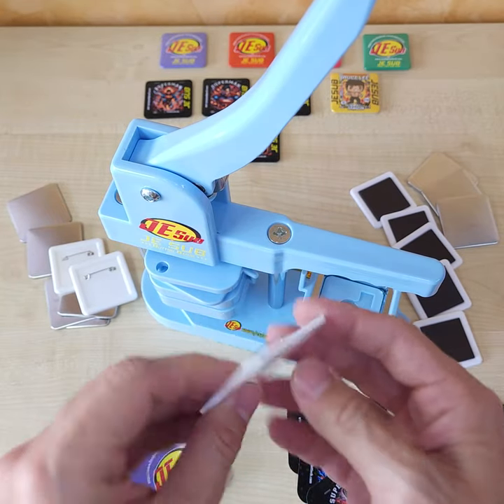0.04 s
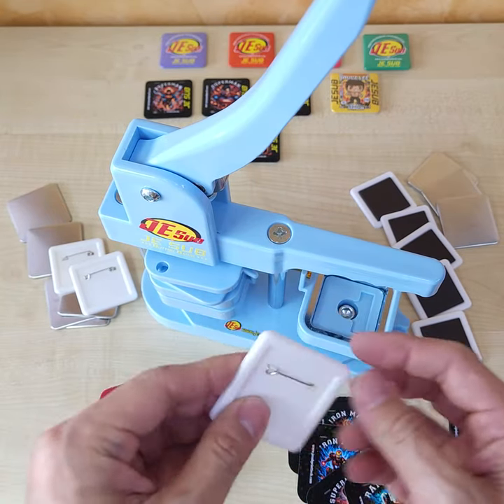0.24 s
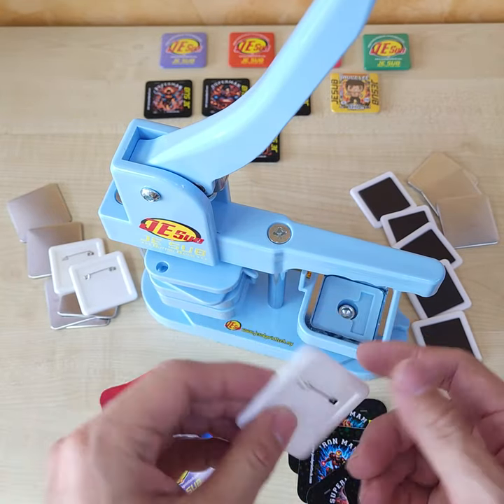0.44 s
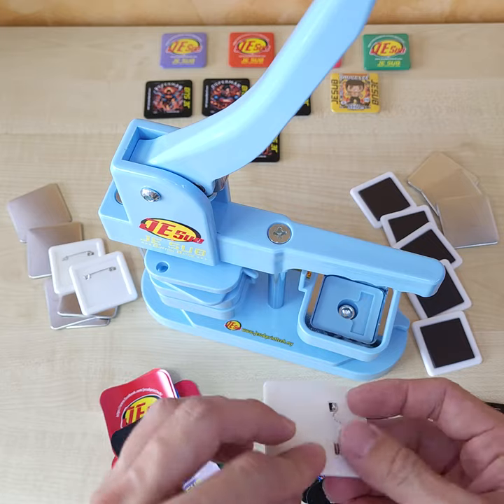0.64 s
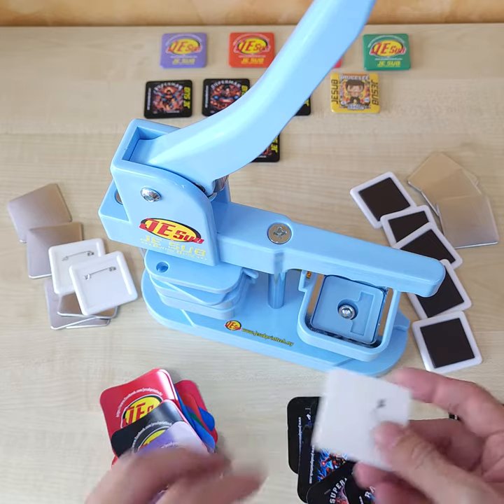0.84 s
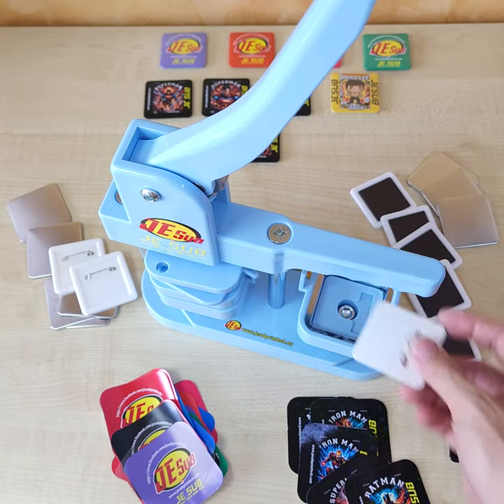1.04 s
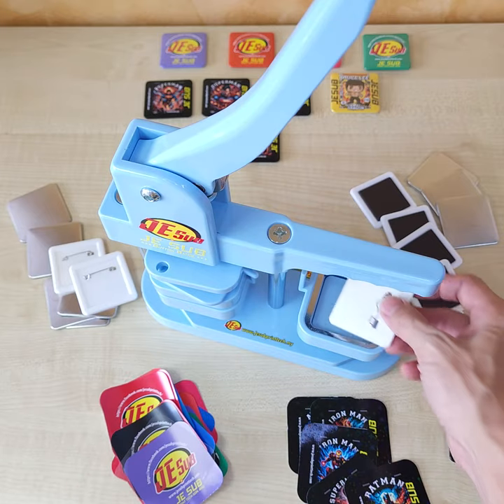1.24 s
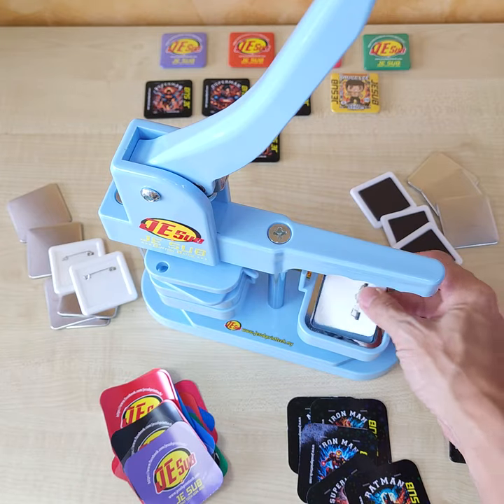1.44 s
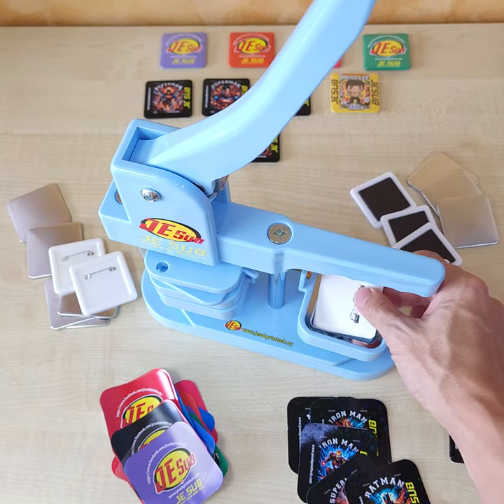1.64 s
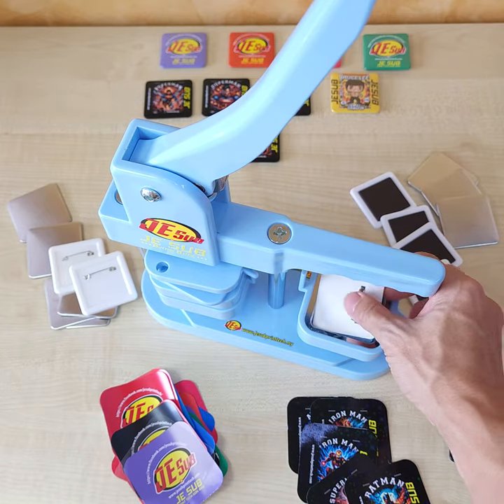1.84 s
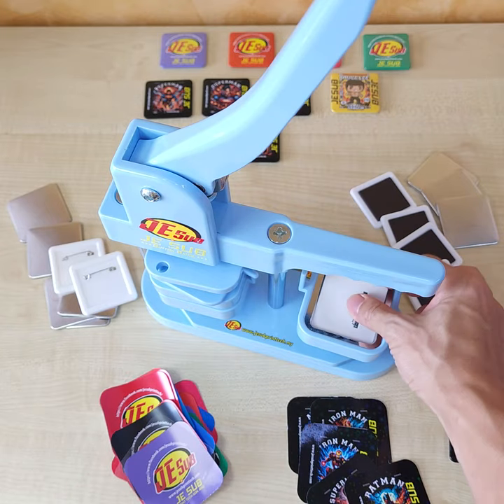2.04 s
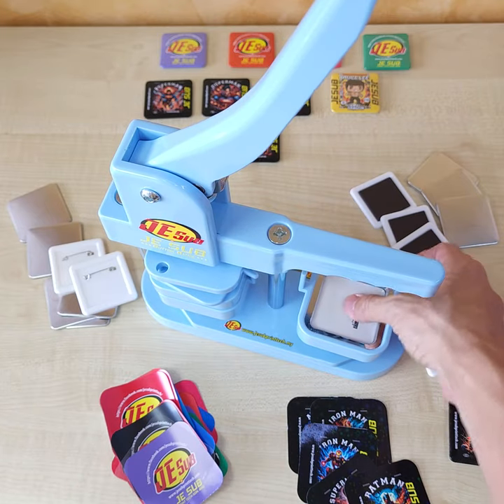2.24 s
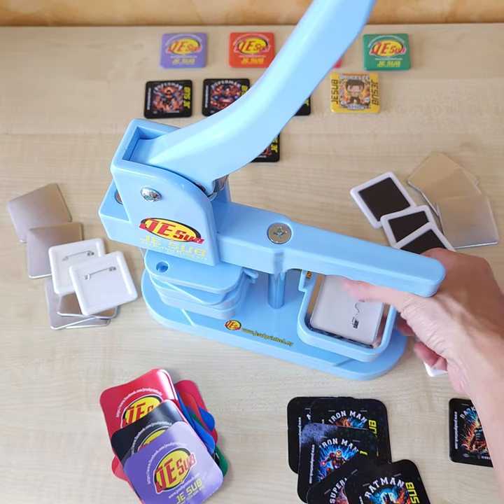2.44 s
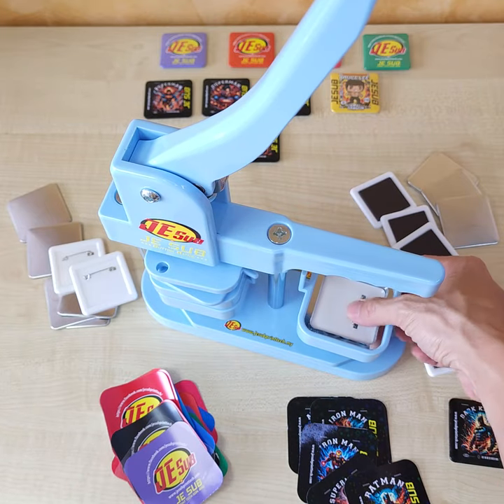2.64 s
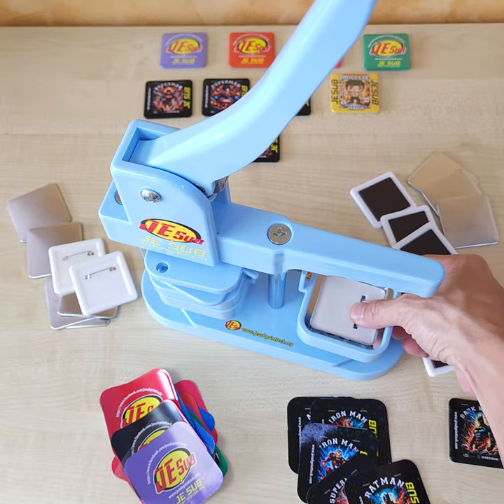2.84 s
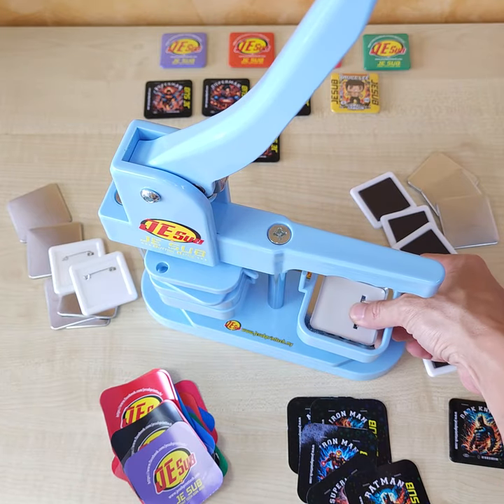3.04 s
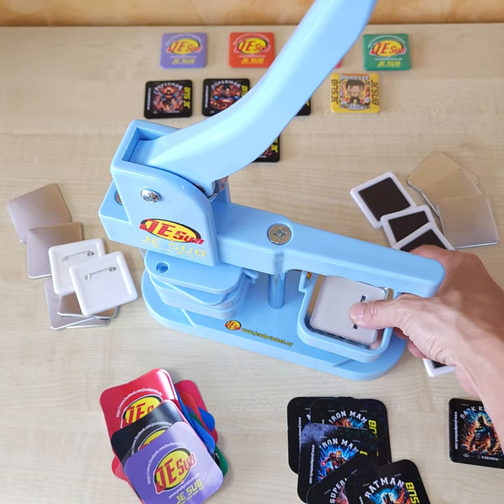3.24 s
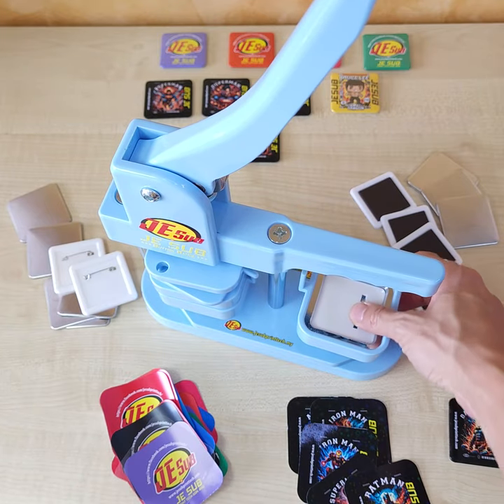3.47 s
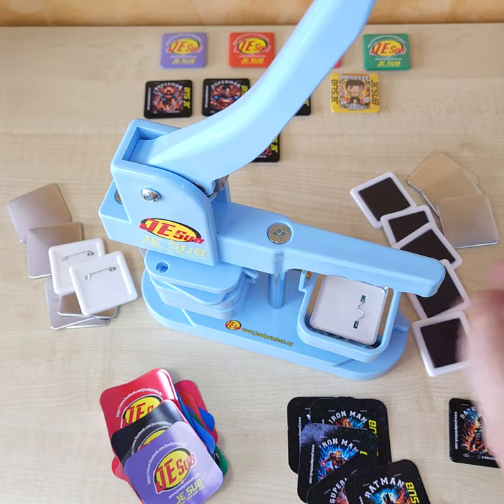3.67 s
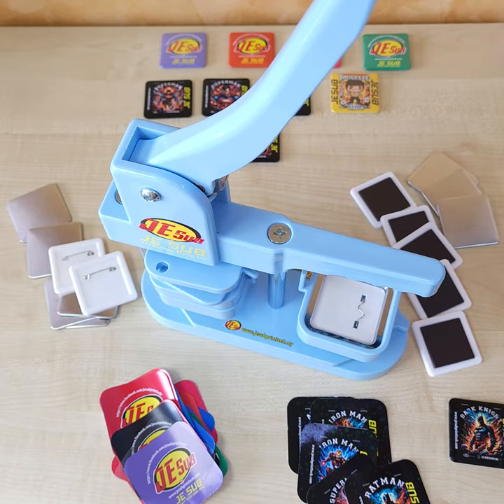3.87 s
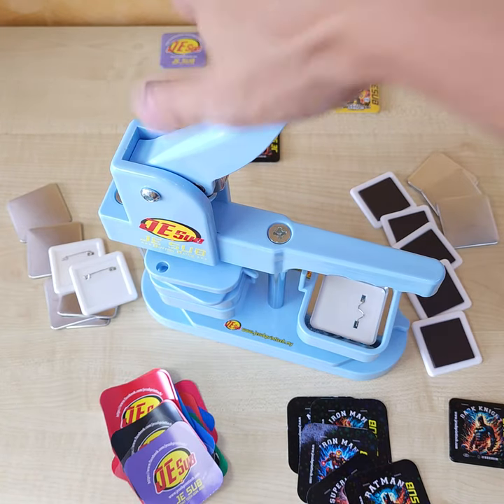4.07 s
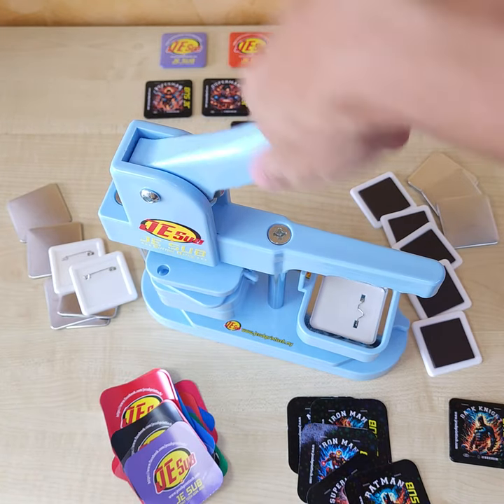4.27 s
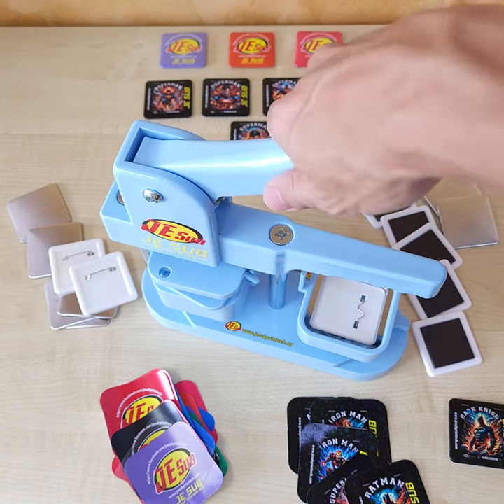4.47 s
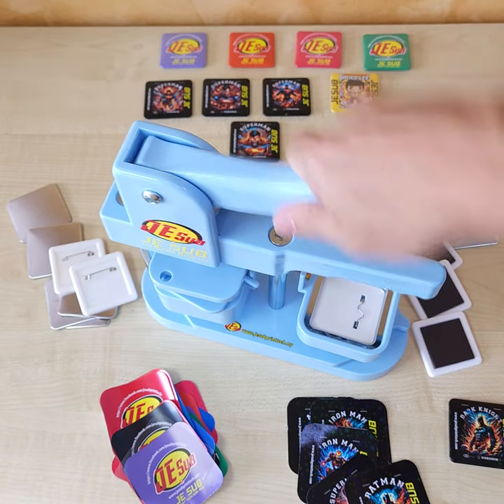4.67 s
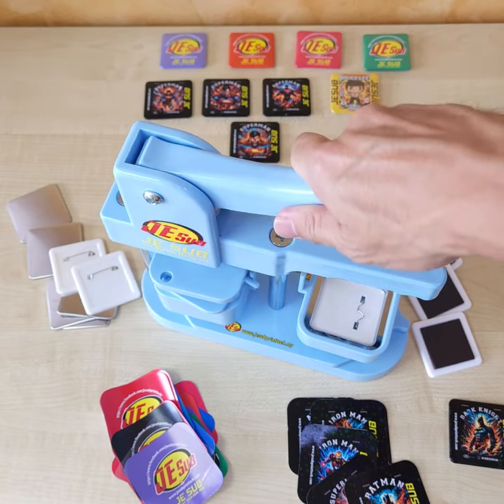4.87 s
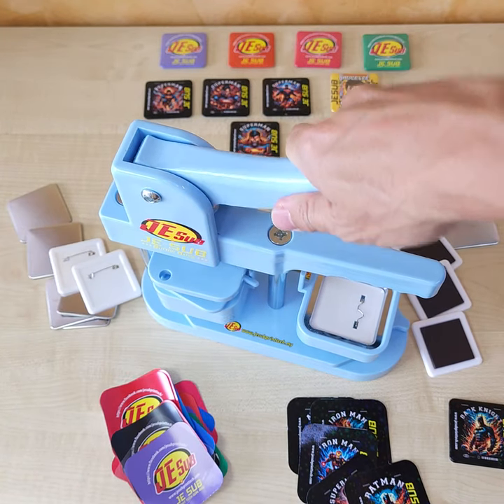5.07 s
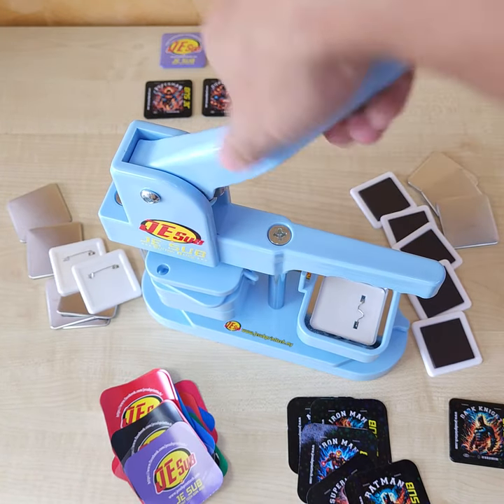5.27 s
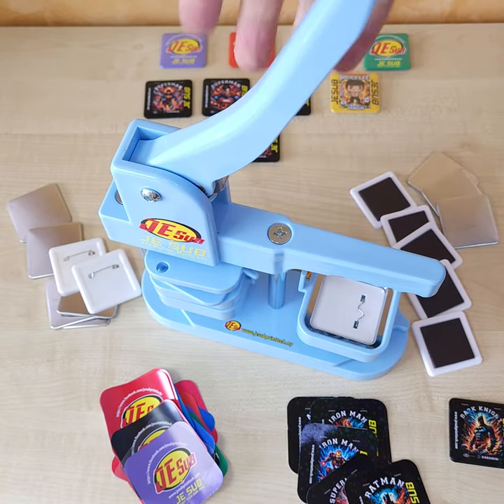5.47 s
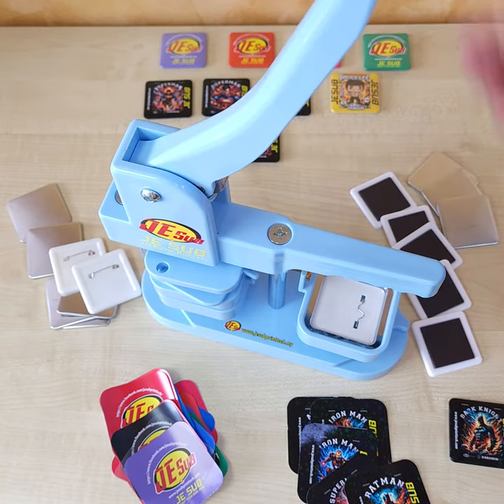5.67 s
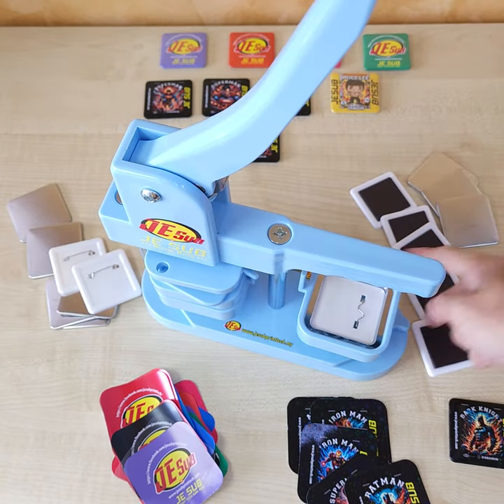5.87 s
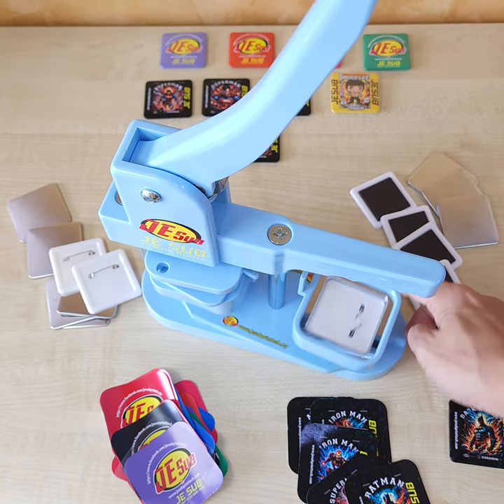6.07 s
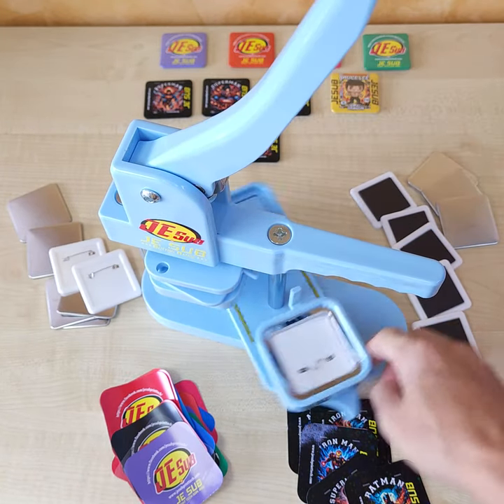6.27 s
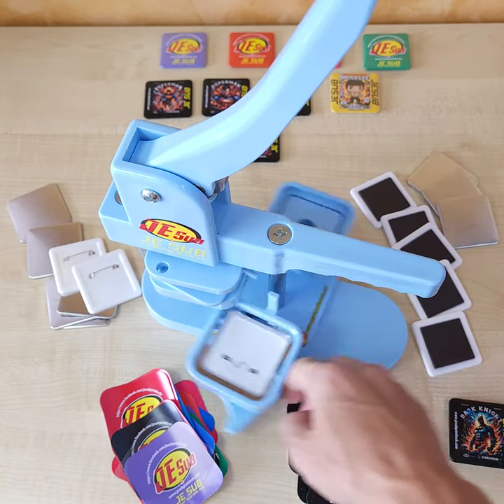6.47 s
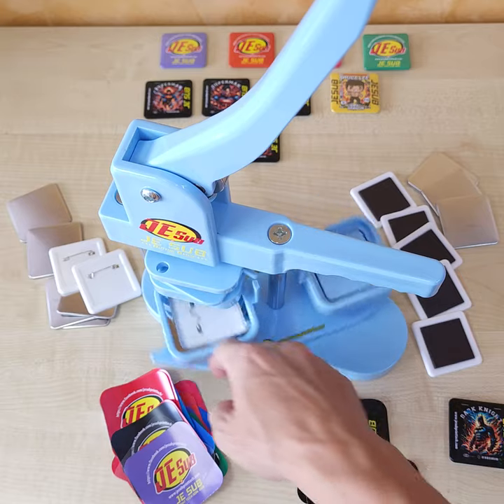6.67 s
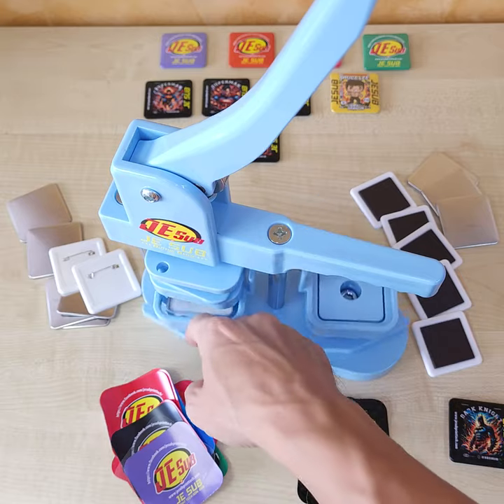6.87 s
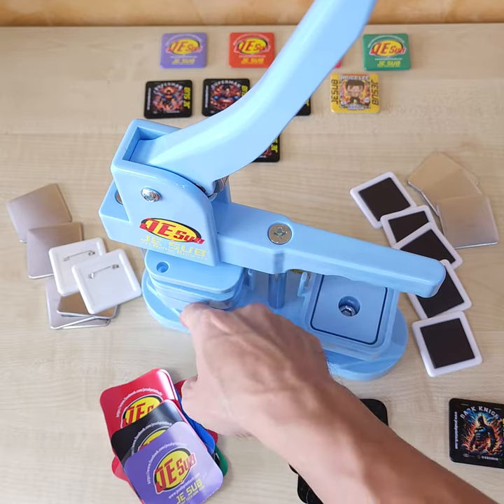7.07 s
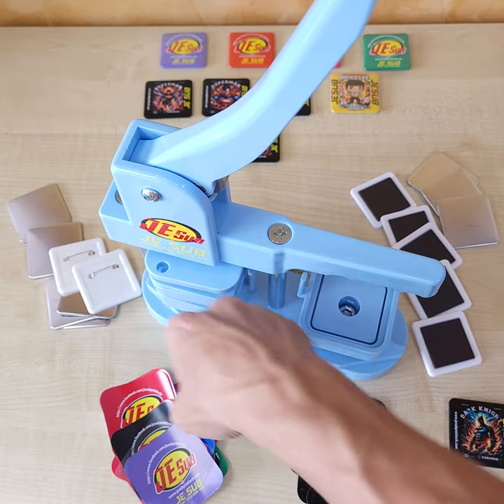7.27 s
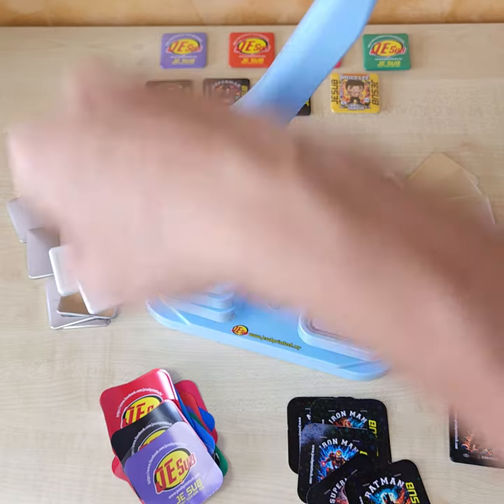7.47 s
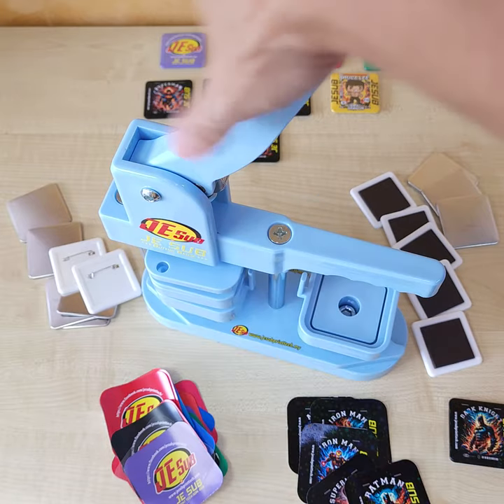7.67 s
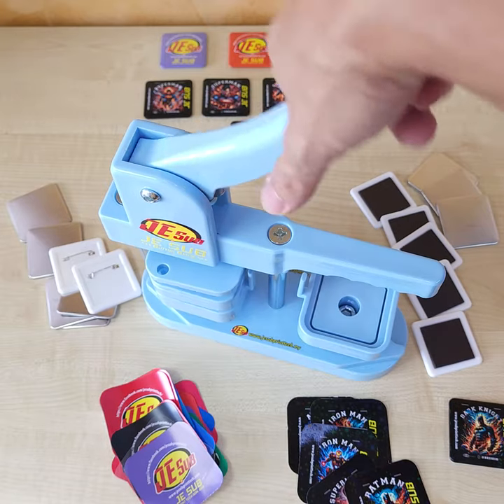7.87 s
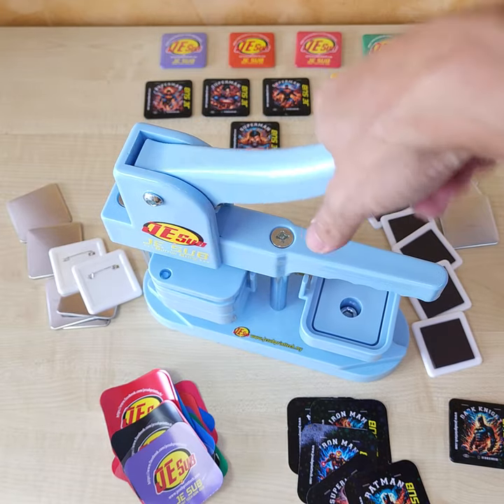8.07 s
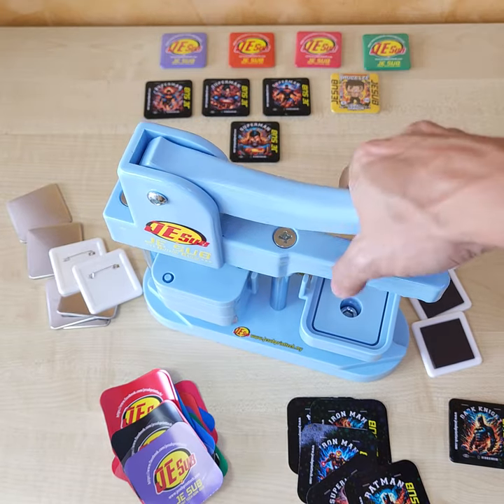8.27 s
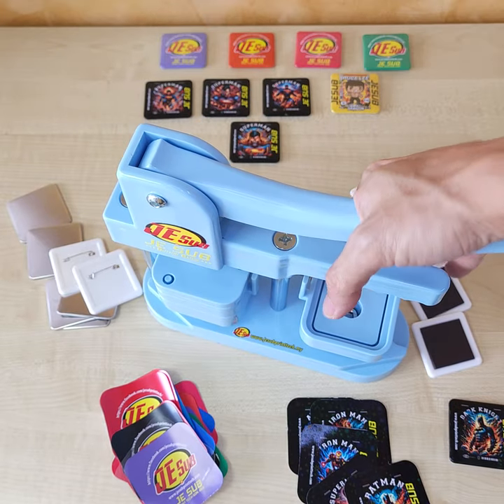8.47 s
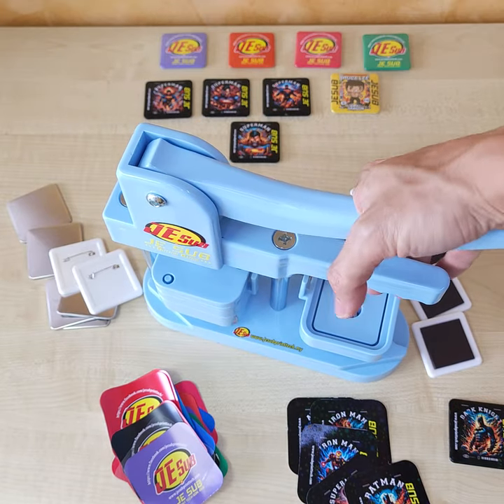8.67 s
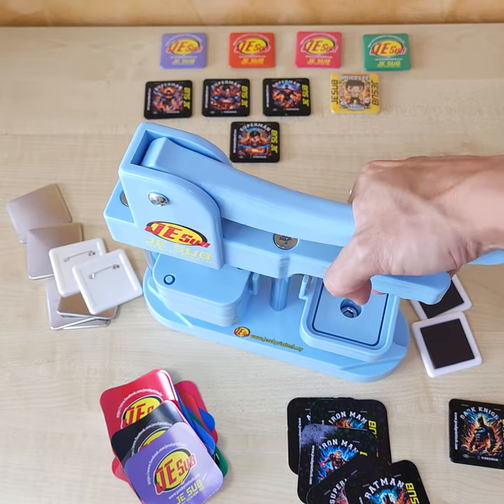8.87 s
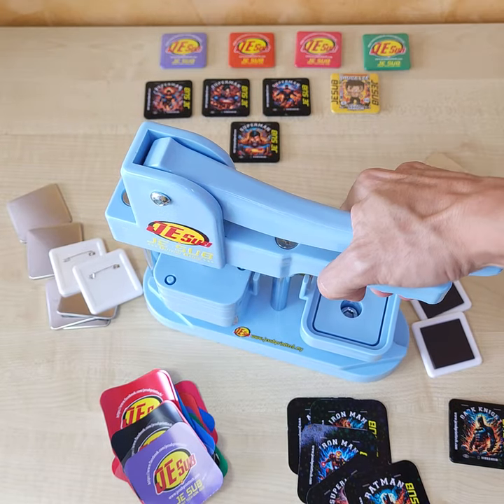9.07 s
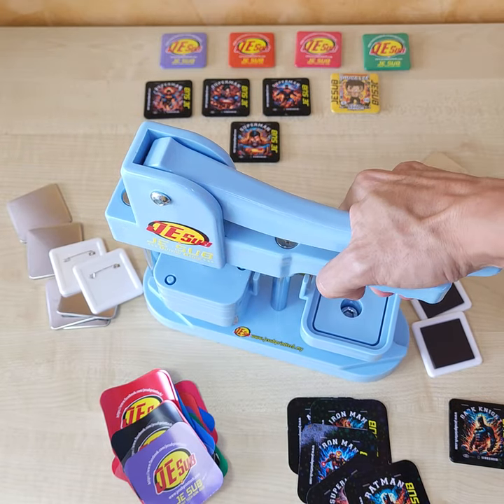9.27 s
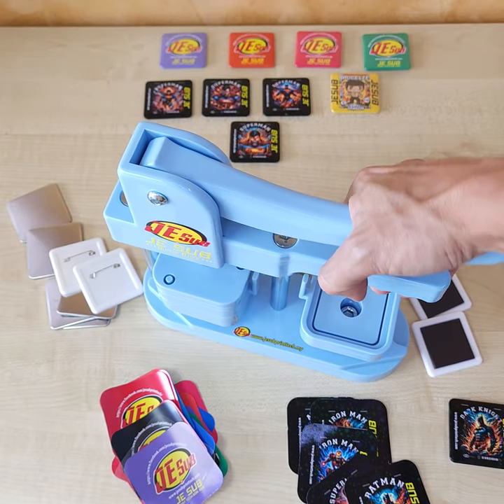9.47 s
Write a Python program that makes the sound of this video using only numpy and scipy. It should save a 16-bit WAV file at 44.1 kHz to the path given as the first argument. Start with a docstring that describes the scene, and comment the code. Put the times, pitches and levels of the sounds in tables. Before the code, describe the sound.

Light plastic clicks and faint rubbing, then two clunking lever strokes on a wooden desk, the last snap loudest, over faint traffic hum.

```python
"""A bare, echoing room: a hand-lever badge press on a wooden desk, close to a phone with two microphone ports.
A badge back is turned in the fingers and pressed into its die; the lever is pulled twice, the carrier turns between.
Contacts are noise bursts through plastic and steel resonances; strong strokes set low desk modes ringing.
Rubbing is noise in uneven strokes. Behind lie filtered-noise traffic and machine hum, and a passing engine of
unsteady sines."""
import sys
import numpy as np
from scipy import signal
from scipy.fft import rfft, irfft, next_fast_len
from scipy.io import wavfile
from scipy.ndimage import uniform_filter1d, map_coordinates

SR = 44100
rng = np.random.default_rng(int(sys.argv[2]) if len(sys.argv) > 2 else 0)


def generate_wav(sig):
    """Save sig (samples, or channels by samples) to the path in sys.argv[1] as 16-bit PCM at SR."""
    pcm = np.round(np.clip(np.atleast_2d(sig).T, -1, 1) * 32767).astype(np.int16)
    wavfile.write(sys.argv[1], SR, pcm)


N = 419391

# Microphone's own noise: (f/Hz, relative density/dB)
HISS = [(1470, -45), (2500, -35), (3270, -4.5), (3540, -5.5), (3650, 10), (3950, 9.5), (5010, -0.5),
        (7200, 7), (7980, 11.5), (8500, -5.5), (8910, -28.5), (12000, -22), (16500, -25.5)]
HISS_DB, TOP_HZ = -84.5, 16000  # noise level; band limit

# Far traffic: (t/s, rumble level/dB, murmur of motors level/dB, tyre rush level/dB)
TOWN = [(0, -55, -67.5, -65.5), (1.6, -55.5, -63, -65.5), (2.4, -55, -61, -61.5), (4, -56, -61, -59),
        (5.8, -55.5, -62, -65), (6.6, -51.5, -59.5, -60), (7.6, -53, -57, -56.5), (9.51, -39.5, -58, -63.5)]
# Colours of the traffic layers, lowest first: (f/Hz, relative density/dB)
DEEP = [(12, -49), (20, -14.5), (43, 10), (75, 0.5), (80, 4), (100, -28.5), (180, -120)]
RUMBLE = [(60, -26.5), (80, -5), (103, 7), (125, 5), (145, 8), (165, -10), (188, -3.5), (215, -11.5),
          (250, -55.5)]
MOTORS = [(190, -38.5), (225, 1), (260, -8.5), (293, 0), (330, -7.5), (375, -6), (480, -8), (560, -59.5)]
TYRES = [(260, -59.5), (450, -8), (1030, -8), (1160, -5.5), (1780, -14), (1940, -22), (2520, -34.5),
         (3000, -32.5), (3900, -52.5), (6600, -120)]
DEEP_DB, DEEP_SWELL_DB = -60.5, 4  # the lowest rumble comes and goes

# Distant engine: (t/s, firing tone level/dB, higher tones level/dB)
ENGINE = [(5.4, -53, -66.5), (6.6, -41, -67.5), (7.1, -45, -56.5), (7.45, -37, -49), (7.95, -46, -54),
          (9, -64, -70.5)]
ENGINE_HZ, SAG_HZ_PER_S, SAG_FROM_S = 63.35, 2.9, 6.3  # firing tone, sinking as it passes

# A machine somewhere in the house: (f/Hz, width/Hz, level/dB)
HUM = [(48.4, 4.7, -64), (108, 19, -56), (148.8, 32, -61), (186.3, 12, -62), (237.2, 7.7, -73),
       (291.6, 10, -67), (384.4, 22, -74)]

# Decay of the room: (f/Hz, t60/s)
ROOM = [(60, 1.1), (160, 1.1), (420, 0.89), (1100, 1.2), (2900, 0.95), (7700, 0.73), (11000, 0.41),
        (16000, 0.45)]
# Likeness of the two ports in a diffuse field: (f/Hz, correlation)
ALIKE = [(60, 1.0), (150, 0.98), (380, 0.7), (950, 0.015), (2380, 0), (5980, 0.064), (15000, 0.22)]
GAP_HZ, GAP_WIDTH_HZ, GAP_DEPTH = 1370, 32, 0.54  # the room answers little in one narrow band

# Strokes that shake the desk: (t/s, peak level/dB, upper modes level/dB, deep share 0-1)
THUMPS = [(2.743, -38, -7, 0.7), (4.284, -34, -3, 0.2), (4.352, -19, -11.5, 0.41),
          (4.439, -21.5, -15.5, 0.9), (4.714, -14, -6, 0.31), (4.738, -15, -22, 0.43),
          (4.788, -23, -15, 0.8), (4.881, -18.5, -37, 0.34), (5.071, -32, -53, 0.36),
          (5.253, -28, -8.5, 0.34), (5.454, -24.5, -16, 0.74), (6.097, -33.5, -15, 0.57),
          (7.11, -31, -5.5, 0.19), (7.97, -26, -7, 0.53), (8.02, -24, -33, 1), (8.183, -15, -16, 0.45),
          (8.204, -23, -21, 0.1), (8.389, -35, -10.5, 0.96), (8.465, -32, -25, 0.96),
          (8.849, -35, -18, 0.51), (9.061, -16.5, -6.5, 0.54)]
# Resonances of the desk: (f/Hz, width/Hz, level/dB)
DESK = [(30.5, 48, -6), (48.7, 11, -15.5), (101.3, 9.1, 12), (135.8, 8.6, 13), (187.3, 70, 1.5),
        (277.3, 15, 7.5), (337, 64, 3.5)]
PUSH_S, BOOM_DB, BOOM_PER_UPPER = 0.014, 3, 0.33  # push decay; room boom, weaker after duller strokes

# Fingers and sliding parts rub: (t/s, length/s, lower level/dB, treble level/dB, loudest ring f/Hz)
RUB = [(0.03, 0.17, -76, -67.5, 3580), (0.5, 0.47, -84, -73, 2370), (1.913, 0.13, -60, -64, 2770),
       (2.14, 0.08, -57, -56.5, 2280), (2.712, 0.089, -64, -67.5, 4000), (4.38, 0.18, -64, -62, 2950),
       (4.692, 0.2, -62, -58.5, 2520), (4.902, 0.16, -63, -92, 2310), (5.13, 0.16, -59, -66.5, 2250),
       (6.096, 0.213, -63, -68, 2620), (6.336, 0.46, -68, -78.5, 2270), (6.796, 0.86, -71, -73, 2500),
       (7.975, 0.051, -49.5, -69, 2640), (8.12, 0.16, -54.5, -52, 3030), (8.328, 0.14, -64.5, -79, 2340),
       (8.553, 0.28, -80.5, -86, 2530)]
# Colours of rubbing, lower part and treble: (f/Hz, level/dB)
SLIDE = [(700, -36), (1100, 3), (2200, 6.5), (3000, 1), (4500, -3.5), (6000, -4), (7000, -35.5)]
BRUSH = [(5000, -42), (6200, -5), (7500, 1), (8600, -9), (12000, -27.5), (16000, -14.5)]
GRIP_S, LET_GO_S = 0.041, 0.031  # a stroke swells in before its time and dies out after its length

# Short swells of one resonance: squeaks when narrow, rubs, rattles and bursts when wide:
# (t/s, length/s, f/Hz, width/Hz, level/dB)
SQUEAKS = [(0.084, 0.063, 3780, 197, -69), (0.167, 0.037, 3730, 253, -68), (0.379, 0.26, 1597, 355, -65),
           (1.885, .04, 2390, 120, -56.5), (2.13, 0.023, 1750, 150, -44), (4.77, 0.064, 13000, 5020, -43.5),
           (5.263, 0.067, 810, 700, -44), (6.098, 0.19, 3520, 200, -65), (6.36, 0.19, 3540, 253, -72.5),
           (6.448, 0.089, 1015, 160, -55), (6.759, 0.037, 7400, 400, -61), (6.761, 0.089, 2800, 149, -60.5),
           (7.936, 0.075, 657, 120.5, -33), (8.175, 0.073, 12380, 6900, -50.5),
           (8.178, .07, 3770, 4490, -40), (8.18, 0.059, 694, 403, -36.5)]

# Clusters left ringing, in the badge back and its pin, then in the die and frame:
# (f/Hz, width/Hz, level relative to the blow/dB, t60/s)
PIN = [(1930, 130, -9, 0.84), (4570, 15, -1.5, .7)]
STEEL = [(798, 97, -13, 1.4), (1055, 81, -16, 0.91), (1690, 280, -19.5, 0.99), (2128, 110, -17, 0.98),
         (2306, 410, -14.5, 1.13), (4024, 500, -13, 0.83), (4730, 330, -12, 0.8), (7540, 300, -15, 0.65)]

# The badge back ticks in the fingers and against its die; lever, ram and carrier knock on their stops:
# (t/s, edge peak level/dB, body over edge/dB, snap over edge/dB, ring f/Hz, left-right level/dB, room level/dB)
TICKS = [(0.044, -74, 1, -2, 1500, 0, -18), (0.662, -56.5, -7, -23.5, 1580, 14, 1),
         (0.738, -28.5, -22, 0.5, 2540, 1.5, -11), (1.154, -57.5, 0.5, -4.5, 2630, -5, 1),
         (1.5233, -32, -18.5, -7, 2450, 2, -6.5), (1.5624, -32.5, -21, -9, 4550, 0.5, -18.5),
         (1.918, -27.5, -11.5, -10.5, 2360, 0, -11), (1.9716, -25, -12.5, 2, 2450, -5, -8.5),
         (2.141, -39, -12.5, -4, 1630, 9.5, -7.5), (2.1786, -28, -19, -3, 1756, 2.5, -11),
         (2.3523, -45, 3, -26, 1620, 6.5, -21), (2.7334, -34, -18, 0, 1660, 2, -6),
         (2.7487, -26, -19, -7, 1750, 6.5, -14), (3.491, -55.5, 10, -32, 1620, 6, -2.5)]
KNOCKS = [(4.2777, -39, -2, -13.5, 1910, 2, -14), (4.2874, -42, 6.5, -11.5, 2030, 4, 1.5),
          (4.3181, -52.5, 13.5, -2, 1620, 1, 10.5), (4.3506, -20.5, -4.5, 1.5, 2043, -2, -9),
          (4.44, -45, 1, -23, 1990, 7, -14), (4.509, -51, 13, -2, 2120, 6, -2.5),
          (4.7044, -27.5, 2.5, 0, 3860, -1, -5.5), (4.7093, -30, 0, -2.5, 3660, 1, -4.5),
          (4.7348, -22.5, 3, -2.5, 1720, 2, -5), (4.7557, -27.5, -1, -2, 2400, 1, -13),
          (4.7894, -37, 0, 3, 3120, 0, -12), (5.0074, -48, 0, -4.5, 1910, 5, -4.5),
          (5.253, -40, 8.5, -5, 1940, 3, -1), (5.2771, -40, 12.5, -4, 1670, 3, -14.5),
          (5.29, -49, 12, -18, 1650, -6, -7), (5.4512, -34.5, 9.5, 3.5, 4280, 3, -8),
          (5.9728, -65.5, 19, -3, 1520, 5, -10), (6.0114, -40.5, -2, -5, 2100, 1, -7.5),
          (6.0901, -60.5, 16, -20, 1480, 16, 3.5), (6.8198, -54, 8, -15, 1660, 6, -4),
          (7.1016, -25, 6, -8, 1720, 2.5, -8), (7.8426, -60, 20.5, -10, 1500, 5, 4),
          (7.8713, -46.5, 16.5, -18, 1570, 1, -10), (7.9133, -50.5, 14.5, -12, 1510, 4, -6),
          (7.9369, -60, 12.5, -3, 1650, 3, -10.5), (7.9623, -44.5, 15, -4.5, 1440, 6, -12),
          (7.9864, -22, -6.5, 1.5, 2358, 0, -9), (8.3911, -46.5, 16, -14, 1558, 3, -8.5),
          (8.539, -60, 0, -25, 1624, 12.5, -3), (8.6144, -55, -11, -17.5, 1570, 10, -8),
          (8.7004, -68.5, -7, -24, 2120, 12, 10), (8.8072, -54.5, 6.5, -2, 1500, 0, -4),
          (8.8631, -53, 12.5, 0, 2440, -3, -5), (8.9028, -62, -2, 8.5, 3280, 0.5, -18),
          (9.0571, -9.5, -5, -1.5, 2047, -4, 3)]
# Resonances of badge back and press: (f/Hz, width/Hz, level/dB)
BADGE = [(760, 150, 2.5), (1430, 130, -2.5), (2070, 180, 2), (3386, 580, 1), (4700, 1980, 0.5),
         (7850, 880, 2), (10740, 980, -3.5), (15000, 12000, -11)]
PRESS = [(440.5, 76, 7.5), (571, 346, 9), (798, 250, 10.5), (1024, 173, 7), (1574, 340, 3), (2059, 230, 3),
         (2357, 700, 1), (3470, 300, 4.5), (3940, 800, 4), (5480, 3230, -1), (7560, 600, 2),
         (8990, 1100, -11.5), (12300, 1100, -10), (17000, 2000, -12.5)]
# Manner of contact: (chatter t60/s, ring level/dB, fizz over edge at zero snap/dB, fizz dB per snap dB)
BADGE_TOUCH = (0.021, 3.9, 4.1, 2.42)
PRESS_TOUCH = (0.0733, 9.5, -4.5, 0.9)
# Borders between body, edge, snap and fizz: (f/Hz)
EDGES_HZ = [1400, 3000, 6500]
HARD_DB_PER_DB, HARD_FROM_DB = 0.34, -35.5  # harder blows chatter more briefly
SNAP_TOP_DB = 3  # the fizz grows no further above this snap


def amp(db):
    """Gain of a level in dB."""
    return 10 ** (np.asarray(db) / 20)


def unit(x):
    """Scaled to rms 1."""
    return x / np.sqrt(np.mean(x ** 2) + 1e-20)


def along(points, hz):
    """Values of (f/Hz, value) points read along a log frequency axis."""
    f, v = np.transpose(points)
    return np.interp(np.log(hz + 1), np.log(f + 1), v)


def curves(rows):
    """One value per sample for each column after the time."""
    s, *cols = np.transpose(rows)
    return np.array([np.interp(np.arange(N) / SR, s, c) for c in cols])


def wobble(rate):
    """A smooth random curve, rate knots a second."""
    knots = rng.standard_normal(int(N * rate / SR) + 4)
    return map_coordinates(knots, [np.arange(N) * rate / SR])


def filtered(x, response):
    """x times a complex response of frequency."""
    n = x.shape[-1]
    m = next_fast_len(n + min(n, SR // 4))
    return irfft(rfft(x, m) * response(np.fft.rfftfreq(m, 1 / SR)), m)[..., :n]


def modes(table, f):
    """Causal response of (f/Hz, width/Hz, level/dB) resonances, their signs alternating."""
    return sum((-1) ** k * amp(db) * 1j * f * w / (c * c - f * f + 1j * f * w)
               for k, (c, w, db) in enumerate(table))


def narrow(hz, width, n):
    """Stereo noise of rms 1 that passed one resonance twice."""
    noise = rng.standard_normal((2, n + SR // 10))
    return unit(filtered(noise, lambda f: modes([(hz, width, 0)], f) ** 2)[:, -n:])


def ported(pair, spectrum):
    """Two unrelated noises as the two ports hear a diffuse field: alike in the bass."""
    def response(hz):
        turn = np.arccos(np.clip(along(ALIKE, hz), -1, 1)) / 2
        return amp(along(spectrum, hz)) * [np.cos(turn), np.sin(turn)]
    both = filtered(pair, response)
    return np.stack([both.sum(-2), both[..., 0, :] - both[..., 1, :]], -2)


def rush(spectrum):
    """Diffuse stereo noise of rms 1."""
    return unit(ported(rng.standard_normal((2, N)), spectrum))


def add(out, s, sound):
    """Mix a stereo sound in from time s."""
    part = out[:, round(s * SR):][:, :sound.shape[1]]
    part += sound[:, :part.shape[1]]


def town():
    """Far traffic through the walls: wavering layers of coloured noise."""
    rumble_db, motors_db, tyres_db = curves(TOWN)
    rumble = amp(rumble_db + 1.5 * wobble(5.5)) * rush(RUMBLE)
    motors = amp(motors_db) * rush(MOTORS)
    tyres = amp(tyres_db + 0.92 * wobble(0.93)) * rush(TYRES)
    deep = amp(DEEP_DB + DEEP_SWELL_DB * wobble(1.4)) * rush(DEEP)
    return rumble + motors + tyres + deep


def engine():
    """A slow distant engine: its firing tone and three higher tones, all unsteady."""
    first_db, over_db = curves(ENGINE)
    hz = ENGINE_HZ - SAG_HZ_PER_S * np.maximum(np.arange(N) / SR - SAG_FROM_S, 0)
    phase = 2 * np.pi * np.cumsum(hz + .8 * wobble(4.6)) / SR
    over = amp(4.1 * wobble(7.2)) * np.sin(3 * phase)
    over += amp(-4.5 + 6.8 * wobble(8)) * np.sin(4.95 * phase)
    over += amp(-1.5 + 4.2 * wobble(6.6)) * np.sin(2 * phase)
    return amp(first_db + 1.5 * wobble(2.7)) * np.sin(phase) + amp(over_db) * over


def hum():
    """A machine's fuzzy steady tones: one noise through narrow resonances, each passed twice."""
    def tones(f):
        # the root of SR / width evens out the power that each resonance lets through
        return sum(amp(db) * modes([(hz, w, 0)], f) ** 2 * np.sqrt(SR / w) * 0.71 for hz, w, db in HUM)
    return filtered(rng.standard_normal(N), tones)


def tails(count):
    """Stereo answers of the room from several spots; each frequency dies at its own speed."""
    noise = ported(rng.standard_normal((count, 2, SR)), [(100, 0)])
    hz, t, z = signal.stft(noise, SR, nperseg=256)
    tail = signal.istft(z * amp(-60 * t / along(ROOM, hz)[:, None]), SR, nperseg=256)[1]
    # echoes thicken after the first walls
    tail = tail * (1 - np.exp(-np.arange(tail.shape[-1]) / SR / 0.0016))
    tail = tail / np.sqrt(np.sum(tail ** 2, -1, keepdims=True))
    return np.pad(tail, ((0, 0), (0, 0), (round(.005 * SR), 0)))[..., :SR]


def echo(response, room, energy):
    """The room's answer to a sound of this colour and energy."""
    tail = filtered(room, response)
    return tail * np.sqrt(energy / np.sum(tail[0] ** 2))


def desk(rooms):
    """A soft push of some ms sets the desk ringing low, nearly alike at both ports; the room booms after it."""
    out, t = np.zeros((2, N)), np.arange(SR // 2) / SR
    for k, (s, db, upper_db, deep) in enumerate(THUMPS):
        room_db = BOOM_DB + BOOM_PER_UPPER * upper_db
        force = (rng.standard_normal(len(t)) + 12 * (t < .002)) * np.exp(-t / PUSH_S)
        deep = np.clip(deep, .02, .98)  # where the load bears decides which low mode answers

        def share_db(c):
            return upper_db if c > 170 else 20 * np.log10(deep if c < 115 else 1 - deep)
        table = [(c, w, g + share_db(c)) for c, w, g in DESK]
        ring = filtered(force, lambda f: modes(table, f))
        ring = ring * amp(db) / np.abs(ring).max()
        add(out, s - .006, ring * amp([[.5], [-.5]]))  # the swing builds for some ms before it peaks
        boom = echo(lambda f: modes(table, f) * (f < 600), rooms[-k % len(rooms)], np.sum(ring ** 2))
        add(out, s, amp(room_db) * boom)
    return out


def unit_density(hz):
    """Gain that brings noise of the lower rubbing colour to rms 1."""
    return 1 / np.sqrt(np.mean(amp(along(SLIDE, hz)) ** 2))


def rubbing():
    """Skin and plastic slide in uneven grips and patches; the ring moves with the place of contact."""
    hz, t, z = signal.stft(rng.standard_normal((2, N)), SR, nperseg=512)
    at = np.minimum(t * SR, N - 1).astype(int)
    patches = uniform_filter1d(rng.standard_normal(z.shape[1:]), size=2, axis=0)
    patches = unit(uniform_filter1d(patches, size=24, axis=1))
    grips_db = 1.4 * wobble(40)[at] + 5 * patches
    colour = np.zeros(z.shape[1:])
    for s, length, level_db, treble_db, ring_hz in RUB:
        swell, fade = 1 + (t - s) / GRIP_S, 1 + (s + length - t) / LET_GO_S
        stroke = np.clip(np.minimum(swell, fade), 0, 1) ** 2
        ring = 1 + 0.37 * np.exp(-(np.log((hz + 1) / ring_hz) / 0.043) ** 2)
        tone = amp(level_db + along(SLIDE, hz)) * ring + amp(treble_db + along(BRUSH, hz))
        colour = np.maximum(colour, tone[:, None] * stroke)
    return unit_density(hz) * signal.istft(z * colour * amp(grips_db), SR, nperseg=512)[1][:, :N]


def squeaks():
    """Short swells of one resonance: squeaks when narrow, rubs, rattles and bursts when wide."""
    out = np.zeros((2, N))
    for s, length, hz, width, db in SQUEAKS:
        sound = narrow(hz, width, SR // 4)[:, :round(length * SR)]
        add(out, s, amp(db) * np.hanning(sound.shape[1]) * sound)
    return out


def rings(events, clusters, reach_db_per_oct):
    """Clusters of close modes fade as rough tones after every blow; those near the blow's own ring wake most."""
    s, db, _, snap_db, ring_hz, _, room_db = np.transpose(events)
    out = np.zeros((2, N))
    for hz, width, under_db, t60 in clusters:
        distance_db = reach_db_per_oct * np.abs(np.log2(hz / ring_hz))
        gains = amp(db + snap_db * (hz > EDGES_HZ[1]) + room_db + under_db - distance_db)
        energy = np.bincount(np.round(s * SR).astype(int), gains ** 2, N)
        slow_decay, quick_rise = amp(-120 / t60 / SR), np.exp(-1 / (0.003 * SR))
        for keep in (slow_decay, quick_rise):
            energy = signal.lfilter([1], [1, -keep], energy)
        out += np.sqrt(energy * (1 - quick_rise)) * narrow(hz, width, N)
    return out


def bands(f):
    """Four overlapping shares of the spectrum that sum to one: body, edge, snap and fizz."""
    above = [1 / (1 + (e / (f + 1)) ** 10) for e in EDGES_HZ]
    return -np.diff([np.ones_like(f)] + above + [np.zeros_like(f)], axis=0)


def contacts(events, body, touch, rooms):
    """Each contact chatters for some ms into the body; how it lands sets its colour and its loudest ring."""
    out, t = np.zeros((2, N)), np.arange(-SR // 250, SR // 12) / SR
    usual_t60, ring_db, fizz_zero_db, fizz_per_snap = touch
    size = rooms.shape[-1]
    f, spectra = np.fft.rfftfreq(size, 1 / SR), rfft(rooms)
    shares = bands(f)
    gap = 1 - GAP_DEPTH * np.exp(-((f - GAP_HZ) / GAP_WIDTH_HZ) ** 2)
    for k, (s, db, body_db, snap_db, hz, pan_db, room_db) in enumerate(events):
        t60 = usual_t60 * amp(-HARD_DB_PER_DB * max(db - HARD_FROM_DB, 0))
        # the fizz follows the snap, steeply for the badge, gently for the press
        fizz_db = fizz_zero_db + fizz_per_snap * min(snap_db, SNAP_TOP_DB)
        attack = np.maximum(1 - np.exp(-t / (0.024 * t60)), 0)
        chatter = rng.standard_normal((3, len(t))) * amp(-60 * t / t60) * attack
        ports = 0.59 * chatter[0] + chatter[1:]  # the two ports face different sides of the part
        table = sorted(body + [(hz, 0.037 * hz, ring_db)])
        parts = filtered(ports, lambda f: modes(table, f) * bands(f)[:, None])
        peaks = np.abs(parts.mean(1)).max(-1)
        levels = amp(db + np.array([body_db, 0, snap_db, fizz_db]))
        parts = parts * (levels / peaks)[:, None, None]
        add(out, s - .005, parts.sum(0) * amp([[pan_db / 2], [-pan_db / 2]]))

        # the walls hear all sides, so the peaks run together
        blurred = [(c, 1.3 * w, g) for c, w, g in sorted(body + [(hz, 0.073 * hz, ring_db - 2.5)])]
        # many small modes, new at each blow
        ripple_db = 0.95 * np.interp(f, 130 * np.arange(200), rng.standard_normal(200))
        answer = spectra[k % len(rooms)] * np.abs(modes(blurred, f)) * amp(ripple_db) * gap
        # band energy is kept from contact to room
        direct_energy = np.sum(parts ** 2, (1, 2)) * size / 4
        gains = np.sqrt(direct_energy / (shares ** 2 @ np.abs(answer[0]) ** 2))
        add(out, s, amp(room_db) * irfft(answer * (gains @ shares), size))
    return out


def scene():
    """All sources at the two ports, from the far town to the press close by."""
    rooms = tails(count=9)
    background = (town() + engine() + hum()) * amp([[.4], [-.4]])
    friction = rubbing() + squeaks()
    friction = friction + amp(-10.5) * signal.fftconvolve(friction, rooms[0], axes=1)[:, :N]
    badge = contacts(TICKS, BADGE, BADGE_TOUCH, rooms) + rings(TICKS, PIN, reach_db_per_oct=36.5)
    press = contacts(KNOCKS, PRESS, PRESS_TOUCH, rooms) + rings(KNOCKS, STEEL, reach_db_per_oct=10.5)
    return background + desk(rooms) + friction + badge + press


def record(dry):
    """The phone adds its hiss, rounds off loud peaks and keeps nothing above its band limit."""
    x = dry + amp(HISS_DB) * rush(HISS)
    rounded = x / (1 + np.abs(x) ** 6) ** (1 / 6)
    return filtered(rounded, lambda hz: hz < TOP_HZ)


dry = scene()
out = record(dry)
generate_wav(out)
```